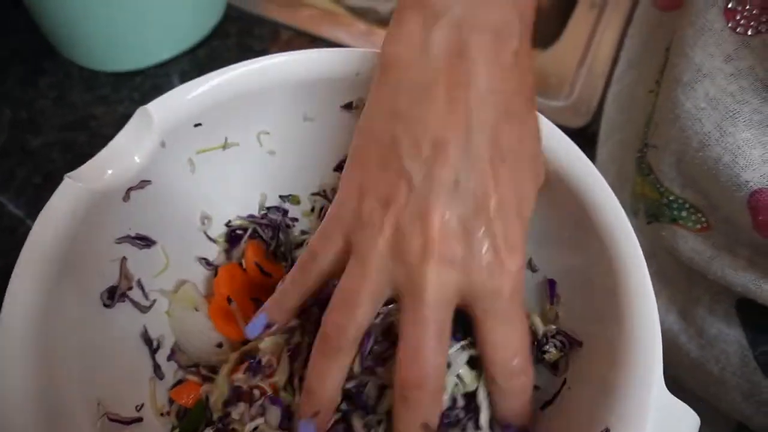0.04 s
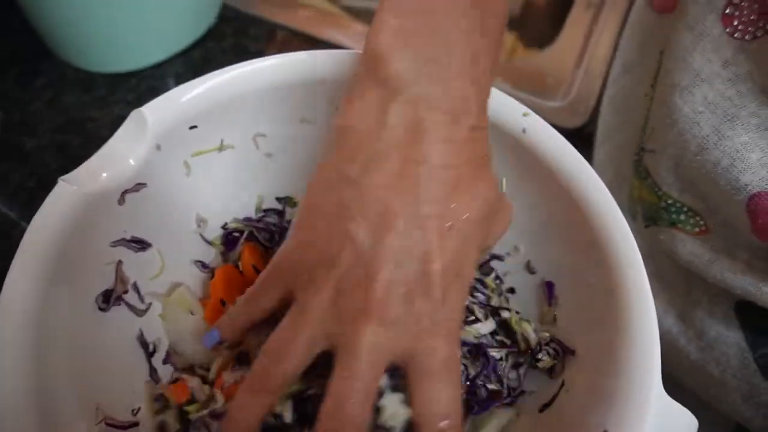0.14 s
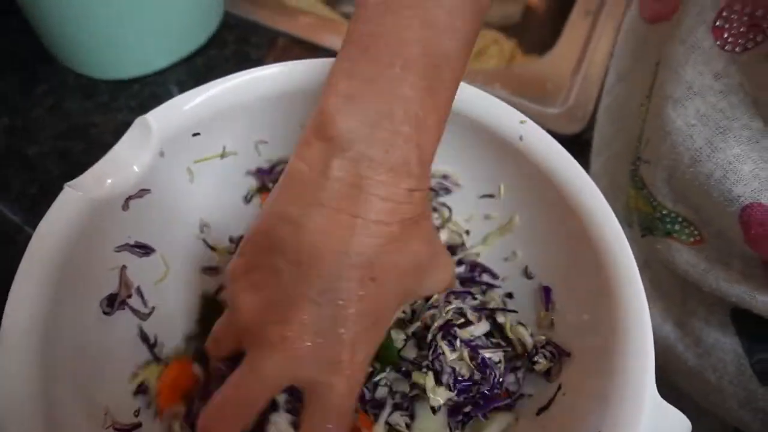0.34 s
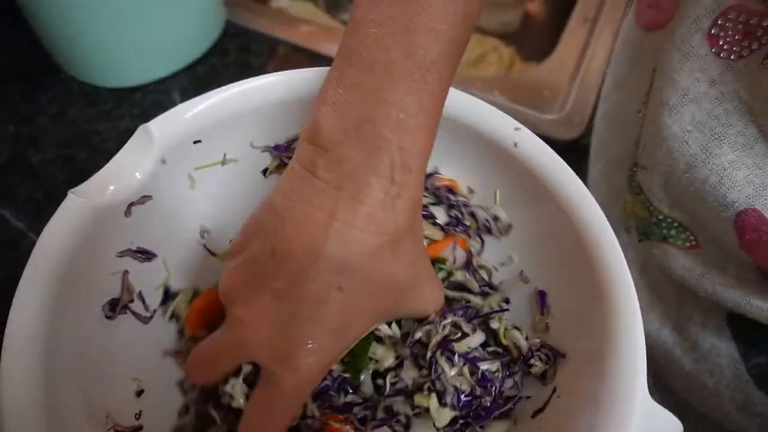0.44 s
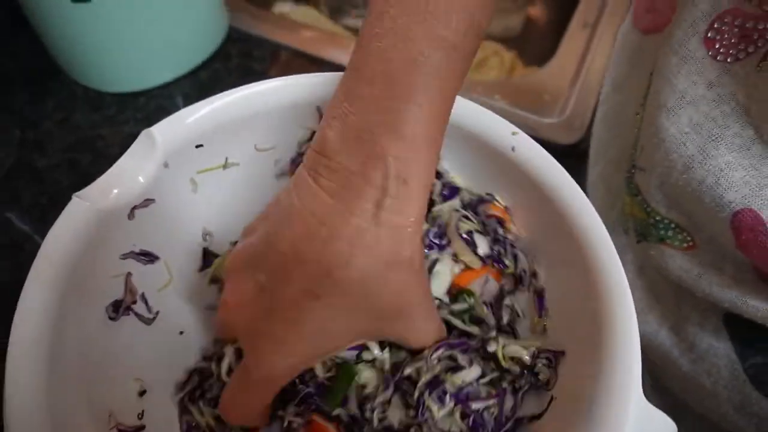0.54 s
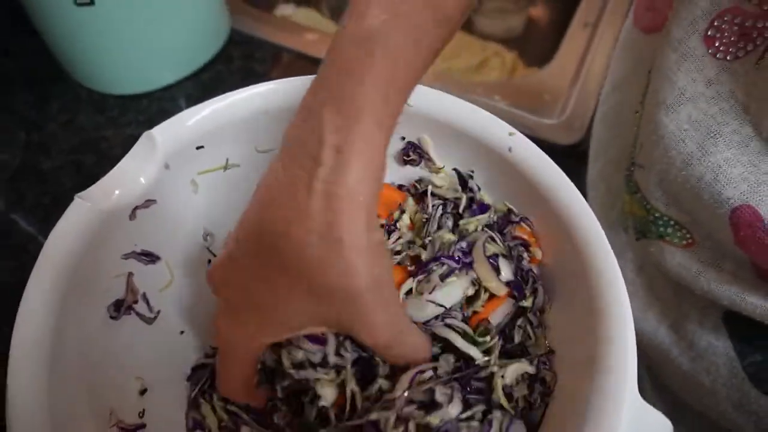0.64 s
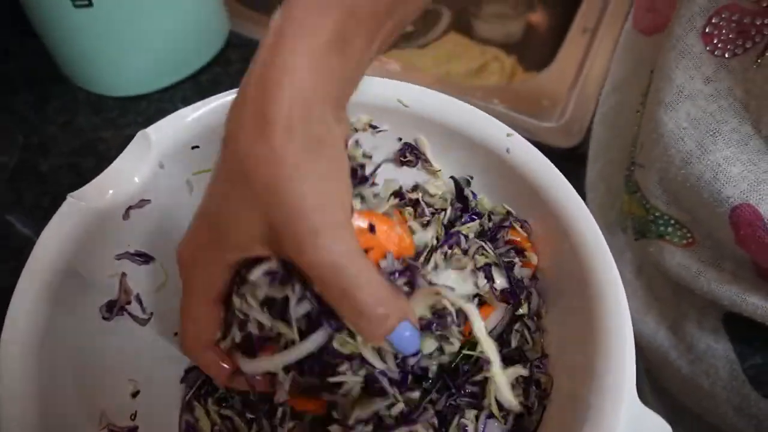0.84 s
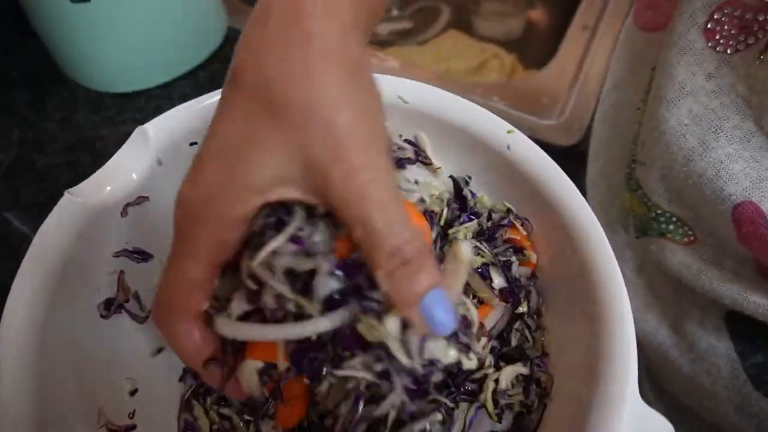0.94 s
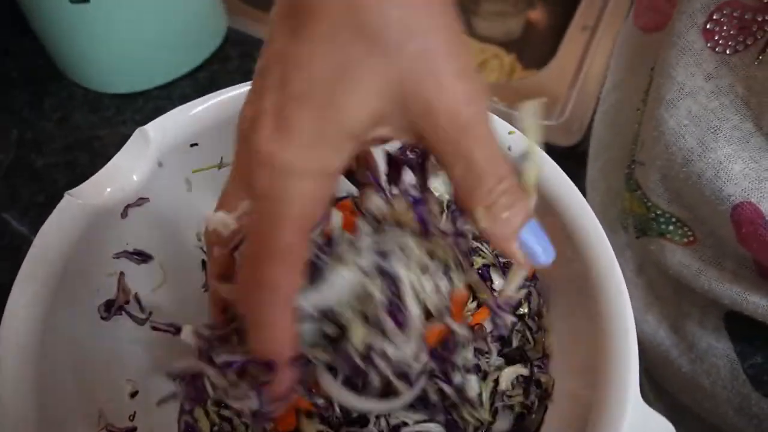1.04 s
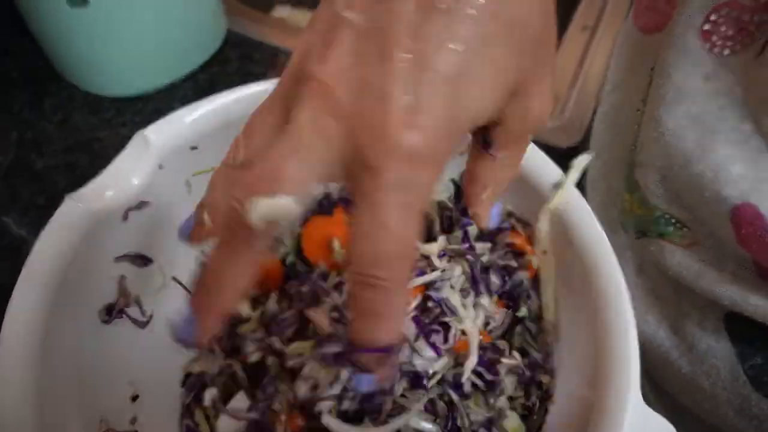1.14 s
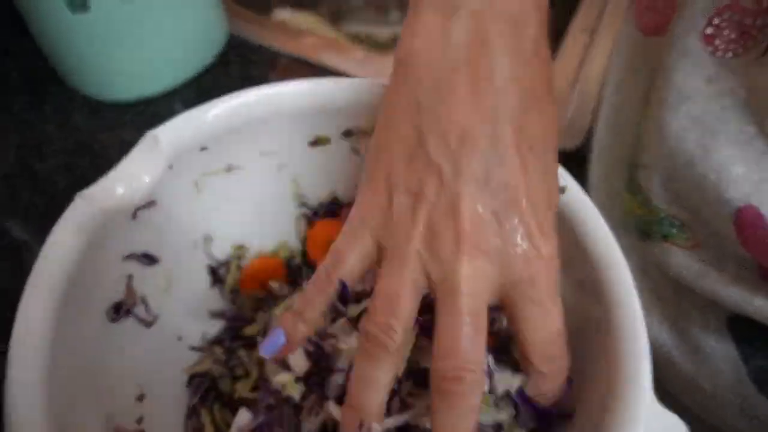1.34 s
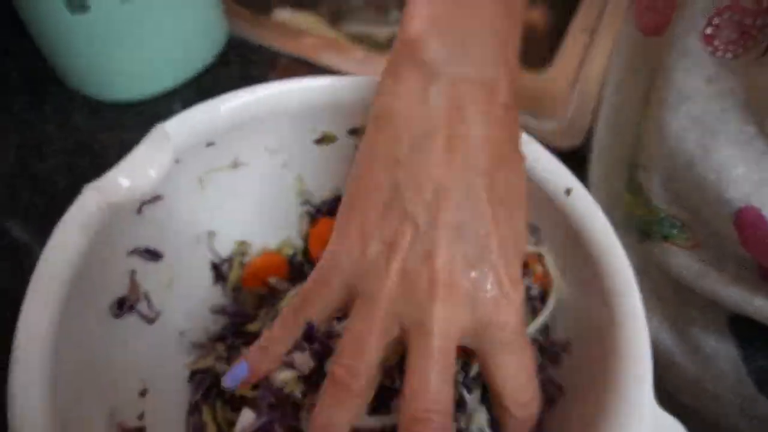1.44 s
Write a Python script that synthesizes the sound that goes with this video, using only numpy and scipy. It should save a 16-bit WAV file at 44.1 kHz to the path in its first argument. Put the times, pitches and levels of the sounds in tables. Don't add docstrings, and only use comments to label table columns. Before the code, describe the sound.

A hand squeezes wet shredded cabbage in a plastic bowl, crunching and snapping, then easing off

```python
import sys
import numpy as np
from scipy import signal
from scipy.fft import rfft, irfft, next_fast_len
from scipy.io import wavfile

SR = 44100
rng = np.random.default_rng(int(sys.argv[2]) if len(sys.argv) > 2 else 0)


def invert_db(level):
    return 10 ** (np.asarray(level, dtype=float) / 20)


def transcribe(signal):
    frames = np.atleast_2d(signal).T
    limited = np.clip(frames, -1, 1)
    pcm = np.round(limited * 32767).astype(np.int16)
    wavfile.write(sys.argv[1], SR, pcm)


N = 66150

CAVITY_HZ = 2122


def rms_one(x):
    return x / np.sqrt(np.mean(x ** 2) + 1e-20)


def at_hz(points, hz):
    points_hz, values = np.transpose(points)
    return np.interp(np.log(hz), np.log(points_hz), values)


def drift(rate_hz):
    r = np.exp(-2 * np.pi * rate_hz / SR)
    settle = 9000
    wander = signal.lfilter([1], [1, -2 * r, r * r], rng.standard_normal(N + settle))
    return rms_one(wander[settle:])


def ring(x, hz, t60_s):
    r = invert_db(-60 / (t60_s * SR))
    w = 2 * np.pi * hz / SR
    return signal.lfilter([0, np.sin(w)], [1, -2 * r * np.cos(w), r * r], x + 1e-18)


def cut(x, hz, kind, order=2):
    return signal.sosfilt(signal.butter(order, hz, kind, fs=SR, output="sos"), x)


def place(x, lag_chance, pan_chance):
    rim_s, rim_db, rim_hz = 0.00064, -4, 8800
    right_lag_s, lag_spread_s = 1.1e-5, 0.8e-5
    pan_db, pan_spread_db = 0.7, 0.5
    spec = rfft(x)
    hz = np.arange(len(x) // 2 + 1) * SR / len(x)
    rim = rng.standard_normal(256) * np.exp(-np.arange(256) / SR / rim_s)
    side = rfft(rim / np.linalg.norm(rim), len(x)) * invert_db(rim_db) * hz / np.hypot(hz, rim_hz)
    lag_s = right_lag_s * (hz / 1e4) ** 2 + lag_spread_s * lag_chance
    lag = np.exp(-2j * np.pi * hz * lag_s)
    half_db = (pan_db + pan_spread_db * pan_chance) / 2
    left = (1 + side) * invert_db(half_db)
    right = (1 - side) * lag * invert_db(-half_db)
    return irfft(spec * np.array([left, right]), len(x))


def place_anywhere(x):
    return place(x, *rng.standard_normal(2))


def add(out, start_s, x):
    i = int(start_s * SR)
    out[..., i:i + x.shape[-1]] += x[..., :N - i]


# time in seconds, rustle level in dB, brightness in dB per octave.
GRIP = [(0.084, -73.5, 4.5), (0.101, -50, -1), (0.151, -55, 0.5), (.2, -46, -2.5), (0.269, -46.5, 3.5),
        (.36, -43.5, 0.5), (.5, -39, -0.5), (0.632, -40.5, -1), (0.699, -48, -4), (0.778, -52.5, -4),
        (0.828, -54, -3), (0.87, -59.5, -2.5), (1.08, -71.5, 5.5), (1.12, -62, 3), (1.21, -68.5, 4.5),
        (1.26, -76.5, 1), (1.41, -71, -1.5), (1.5, -63.5, 1.5)]
# frequency in Hz, level in dB.
RUSTLE_SPECTRUM = [(110, -75.5), (640, -27), (950, -31.5), (1350, -9), (2100, -6), (4300, -9),
                   (7500, -24.5), (15500, -48.5)]


def rustle():
    grains_per_s, grain_cycles, grain_wet_s = 18000, 17.7, 0.0017
    grain_spread_db, clump_db, clump_hz = 1.3, 1.0, 27
    cavity_db, cavity_octaves, rustle_db = 4.5, 0.2, -2
    s, level_db, bright_db = np.transpose(GRIP)
    t = np.arange(N) / SR
    level_db = np.interp(t, s, level_db)
    bright_db = np.interp(t, s, bright_db)

    size_db = grain_spread_db * np.minimum(rng.exponential(1, N), 4.5) + clump_db * drift(clump_hz)
    sizes = invert_db(size_db) * rng.choice([-1, 1], N)
    clicks = sizes * (rng.random(N) < grains_per_s / SR)
    pitches_hz = np.geomspace(110, 14500, 40)
    dealt = (40 * rng.random(N) ** 0.5).astype(int)
    out = 0
    for k, hz in enumerate(pitches_hz):
        grains = ring(clicks * (dealt == k), hz, grain_cycles / hz + grain_wet_s)
        band = cut(grains, [hz / 1.225, hz * 1.267], "band")
        hollow_db = cavity_db * np.exp(-(np.log2(hz / CAVITY_HZ) / cavity_octaves) ** 2)
        tilt_db = bright_db * np.log2(hz / 2500)
        gain = invert_db(at_hz(RUSTLE_SPECTRUM, hz) + hollow_db + tilt_db) * np.sqrt(hz)
        out = out + place_anywhere(rms_one(band)) * gain
    steady = np.sqrt(sum(invert_db(2 * at_hz(RUSTLE_SPECTRUM, hz)) * hz for hz in pitches_hz))
    return out / steady * invert_db(level_db + rustle_db)


def fibre_break(hz, crack_db, length_s, cycles):
    rise, tail_s, tail_db, first_fibre = 0.21, 0.01, -19.5, 2.2
    body_db, hollow_db, hollow_t60_s = -10, -15.5, 0.027
    t = np.arange(2048) / SR
    noise = rng.standard_normal((4, len(t)))
    hold = np.minimum(t / (rise * length_s), 1) / (1 + (t / length_s) ** 6)
    tail = invert_db(tail_db) * np.exp(-t / tail_s)
    burst = noise[:3] * (1 + 0.11 * noise[3]) * (hold + tail)
    burst[:2, 2:5] += first_fibre

    tone = rms_one(ring(burst[0], hz, cycles / hz))
    tone = tone + invert_db(body_db) * rms_one(ring(burst[1], 1.313 * hz, cycles / hz))
    tone = tone + invert_db(hollow_db) * rms_one(ring(burst[1], CAVITY_HZ, hollow_t60_s))
    tone = cut(tone, 0.82 * min(hz, 2400), "high", order=4)
    tone = cut(tone, 2.05 * hz, "low")

    crack = burst[2] * np.exp(-t / (0.5 * length_s + 0.001))
    crack = cut(crack, [3000, 6340], "band")
    crack = cut(crack, 10400, "low", order=1)
    return tone / np.abs(tone).max() + invert_db(crack_db + 1.5) * crack / np.abs(crack).max()


# start in seconds, peak in dB, pitch in Hz, crack in dB, length in seconds.
CRUNCHES = [(.0934, -49, 2400, -25, 0.0026), (.1074, -45, 1600, -19, 0.0058),
            (.117, -44, 2500, -14, 0.0068), (.1894, -46, 1970, -25, 0.0067),
            (.2458, -25.5, 2276, -4.5, 0.0069), (.2945, -36, 2250, -5.5, 0.00365),
            (.131, -52.5, 3300, -22, 0.011), (.2315, -37.5, 5900, -18.5, 0.0073),
            (.502, -47, 4380, -25, 0.0032), (.3586, -30.5, 2173, -29.5, 0.007),
            (.4349, -25.5, 2296, -9.5, 0.0064), (.4352, -29, 1650, -27, 0.003),
            (.5268, -21.5, 3160, -29, 0.01), (.529, -18, 4170, -13, 0.0092), (.534, -24, 2542, -38, 0.0064),
            (.529, -38, 5100, -24, 0.016), (.5464, -29.5, 3380, -14, 0.006),
            (.5555, -23.5, 3300, -14, 0.015), (.610, -31.5, 1880, -18, 0.006),
            (.6172, -29.5, 1580, -13.5, 0.011), (.6894, -41, 1830, -35, 0.0035),
            (.8094, -41, 1610, -22, 0.017), (.8244, -41.5, 2720, -28, 0.0053),
            (1.0335, -45, 2110, -11.5, 0.014), (1.1089, -63, 2420, 9.5, 0.014),
            (1.1827, -54, 1860, -4.5, 0.024), (1.2044, -54, 1930, -1, 0.01),
            (1.2166, -42, 2330, -20, 0.0048), (1.3975, -49.5, 2097, -13, 0.0044),
            (1.4238, -51, 1870, -6.5, .003), (1.429, -54.5, 2270, -8, 0.0085),
            (1.4462, -48, 1765, -20, 0.0079), (1.4532, -50, 1900, -22, 0.0055),
            (1.484, -56.5, 2130, -1, 0.0062), (.813, -43, 2900, -21, 0.0037),
            (.792, -42, 1950, -17, 0.0043), (.836, -47.5, 1674, -16, 0.0071),
            (.66, -38.5, 1525, -28, 0.011), (.121, -52, 2400, -20, .014), (.24, -55, 1080, -23, 0.025)]


def crunches():
    out = np.zeros((2, N))
    for s, db, hz, crack_db, length_s in CRUNCHES:
        x = fibre_break(hz, crack_db, length_s, cycles=34)
        add(out, s, place_anywhere(invert_db(db) * x))
    return out


# start in seconds, peak in dB, pitch in Hz, bright crack in dB.
SNAPS = [(0.1727, -36.5, 1760, -9), (.1765, -42, 1880, -14), (0.1012, -40, 3450, -15),
         (.1015, -46, 4450, -15), (0.2137, -32.5, 2140, -29), (0.2310, -35.5, 2130, -4),
         (0.2454, -20.5, 3000, -1), (0.2673, -40, 2200, -9), (.3042, -32.5, 2090, -4),
         (.3625, -38, 2150, -25), (.372, -40, 2174, -23), (0.391, -47, 2170, -25), (.4148, -38, 2290, -20),
         (0.4508, -31, 1970, -25), (0.4552, -32.5, 1840, -16), (0.4656, -29, 2520, -25),
         (.5902, -33, 2540, -17), (0.3384, -30, 2360, -3), (0.408, -27.5, 2100, -21),
         (0.4804, -28, 2540, -23), (0.5078, -23, 2820, -8.5), (0.518, -33, 3000, -18),
         (0.5692, -19.5, 2120, -8.5), (0.5714, -27, 2380, -7), (0.5961, -29, 1760, -29),
         (0.6390, -24, 1840, -32), (0.646, -31, 1760, -13), (0.6575, -30, 2900, -29),
         (0.7143, -27, 1790, -23), (0.7394, -24, 1900, -21.5), (0.748, -37, 1830, -11),
         (.728, -35, 2050, -20), (0.956, -53, 3670, -13), (1.136, -49, 4730, 0), (0.7709, -35.5, 2000, -30),
         (0.9921, -48, 2270, -4.5), (1.3443, -72, 1960, -17), (1.354, -54, 1880, -20),
         (1.3966, -48, 3340, -9), (1.396, -68, 4840, -26), (1.4645, -61, 2150, -12),
         (1.4695, -57, 2100, -20), (1.475, -56, 2100, -20), (1.4945, -54, 2100, -12),
         (0.5563, -20, 1990, -21), (0.4968, -30, 2590, -18)]


def snaps():
    out = np.zeros((2, N))
    for s, db, hz, crack_db in SNAPS:
        x = fibre_break(hz, crack_db, length_s=0.00038, cycles=15.2)
        add(out, s, place_anywhere(invert_db(db) * x))
    return out


# start in seconds, peak in dB, pitch in Hz.
TICKS = [(0.12, -58, 5600), (0.62, -64, 14000), (0.98, -61, 5600), (0.64, -54, 5300), (0.29, -47.5, 9100),
         (0.38, -63, 8300), (0.47, -64, 7800), (0.97, -57, 11000), (0.878, -54.5, 6500),
         (0.896, -46.5, 4840), (0.987, -58, 7300), (0.65, -45, 4400), (1.1096, -60, 6200), (1.9, -46, 6300),
         (1.4, -66, 5700), (.39, -47, 6500), (0.077, -63, 8100), (0.38, -65, 9300)]


def ticks():
    cycles, burst_s = 18, 0.0011
    out = np.zeros((2, N))
    for s, db, hz in TICKS:
        burst = rng.standard_normal(512) * np.exp(-np.arange(512) / SR / burst_s)
        x = cut(ring(burst, hz, cycles / hz), 3500, "high")
        add(out, s, place_anywhere(invert_db(db) * x / np.abs(x).max()))
    return out


# start in seconds, peak in dB, lowest pitch reached in Hz, pitch the spot favours in Hz.
KNOCKS = [(0.099, -45, 60, 332), (.117, -42.5, 203, 436), (0.131, -47, 60, 139), (0.171, -51.5, 950, 1090),
          (0.175, -56.5, 380, 460), (.212, -53, 403, 600), (.527, -51, 520, 646), (.438, -70, 100, 196),
          (.569, -44, 885, 1060), (.573, -46.5, 535, 640), (.596, -49, 533, 616), (.617, -51, 506, 615),
          (0.721, -74, 500, 610)]
# frequency in Hz, level in dB, T60 in seconds.
BOWL_MODES = [(65.4, -23, 0.37), (128, -12, 0.23), (213, -2, 0.1), (362, -1, 0.1), (445, -2, 0.063),
              (539, 0.5, 0.075), (641, 6, 0.035), (1086, 7.5, 0.11)]


def bowl():
    off_spot_db_per_octave, spot_chance_db = 9, 1.2
    out = np.zeros(N)
    click = np.eye(1, SR // 2)[0]
    for s, db, low_hz, spot_hz in KNOCKS:
        modes = 0
        for k, (hz, level_db, t60_s) in enumerate(BOWL_MODES):
            off_spot_db = off_spot_db_per_octave * abs(np.log2(hz / spot_hz))
            mode_db = level_db - off_spot_db + spot_chance_db * rng.standard_normal()
            modes = modes + invert_db(mode_db) * (-1) ** k * ring(click, hz, t60_s)
        add(out, s, invert_db(db - 6) * cut(modes, low_hz, "high", order=4))
    return place(cut(out, 1260, "low"), 0, 0)


def kitchen(x):
    t60_s, wall_cut_hz = 0.74, 3060
    size = next_fast_len(N + SR)
    z = np.exp(-2j * np.pi * np.arange(size // 2 + 1) / size)
    spec = rfft(x, size)
    out = np.zeros((2, N))
    dull = np.exp(-2 * np.pi * wall_cut_hz / SR)
    wall = (1 - dull) / (1 - dull * z)
    lags = (rng.uniform(0.004, 0.028, 16) * SR).astype(int)
    for k, lag in enumerate(lags):
        loop = invert_db(-60 * lag / SR / t60_s) * wall * z ** lag
        out[k % 2] += irfft(spec * loop / (1 - loop), size)[:N] * (-1) ** (k // 2)
    return out


# frequency in Hz, level in dB.
ROOM_SPECTRUM = [(25, -44), (100, -25), (300, -14), (480, -7), (750, -8.5), (2000, -9.5), (4000, -13.5),
                 (15500, -28)]
# frequency in Hz, left-right likeness from 0 to 1.
ROOM_LIKENESS = [(60, 0.99), (170, 1), (380, 0.57), (2380, 0.48), (15000, 0.044)]


def room_tone():
    tone_db, hum_db, hum_hz, hum_width_hz = -73, -86, 490, 14
    knock_db, knock_t60_s = -82, 0.37
    edges_hz = 25 * 2 ** np.arange(0, 9.6, 0.5)
    white = rng.standard_normal((2, 2, N))
    out = 0
    for k, (low_hz, high_hz) in enumerate(zip(edges_hz, edges_hz[1:])):
        mid, side = cut(white[k % 2], [low_hz, high_hz], "band")
        hz = np.sqrt(low_hz * high_hz)
        alike = np.clip(at_hz(ROOM_LIKENESS, hz), 0, 1)
        stereo = np.sqrt(1 + alike) * mid + np.sqrt(1 - alike) * side * [[1], [-1]]
        out = out + invert_db(at_hz(ROOM_SPECTRUM, hz)) * stereo
    hum = invert_db(hum_db) * rms_one(ring(white[0, 0], hum_hz, 3.0 / hum_width_hz))
    fade_db = knock_db - 60 * np.arange(N) / SR / knock_t60_s
    tail = invert_db(fade_db) * rms_one(cut(white[1, 0], [105, 150], "band"))
    return invert_db(tone_db) * rms_one(out) + hum + tail


def scene():
    near = rustle() + snaps() + crunches() + ticks() + bowl()
    echo = invert_db(-26.5) * kitchen(near.mean(axis=0))
    return near + echo + room_tone()


def top_cut(x):
    return signal.sosfilt(signal.butter(12, 15710, fs=SR, output="sos"), x)


def record(dry):
    low_pass = signal.cheby2(12, 60, 16400, fs=SR, output="sos")
    mix = signal.sosfilt(low_pass, dry)
    return top_cut(mix)


dry = scene()
out = record(dry)
transcribe(out)
```